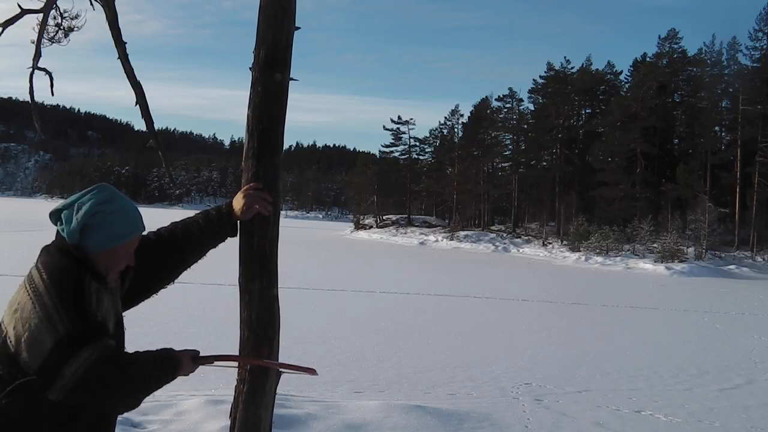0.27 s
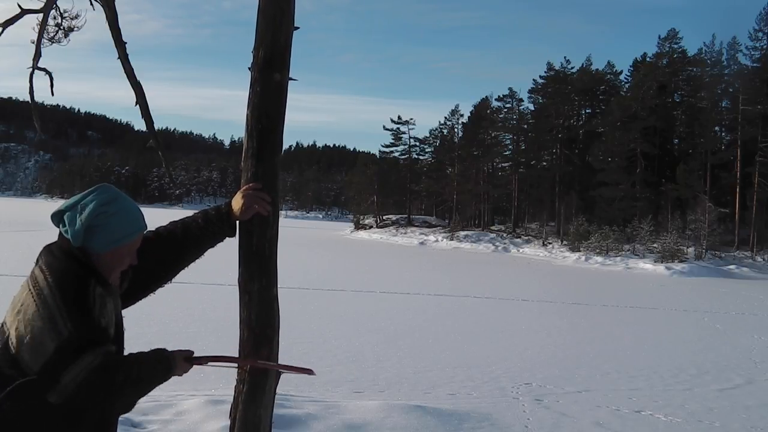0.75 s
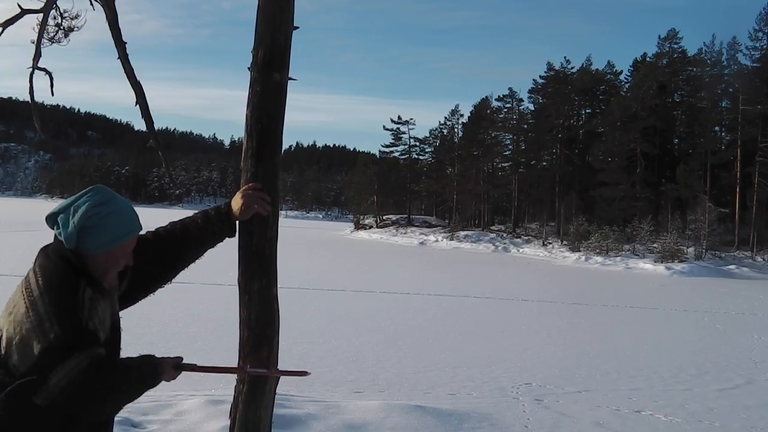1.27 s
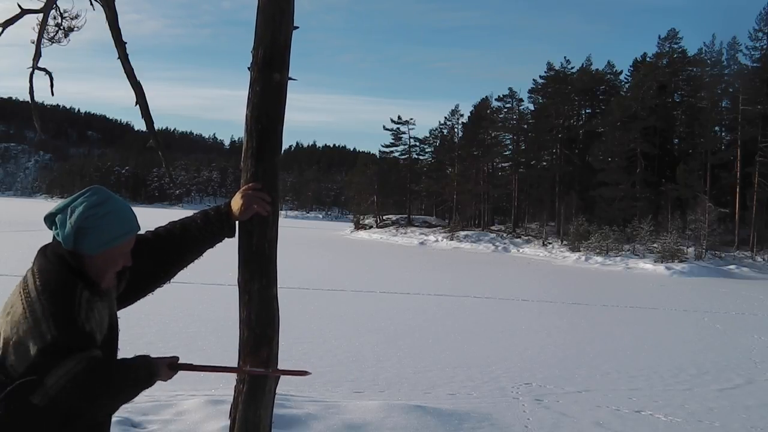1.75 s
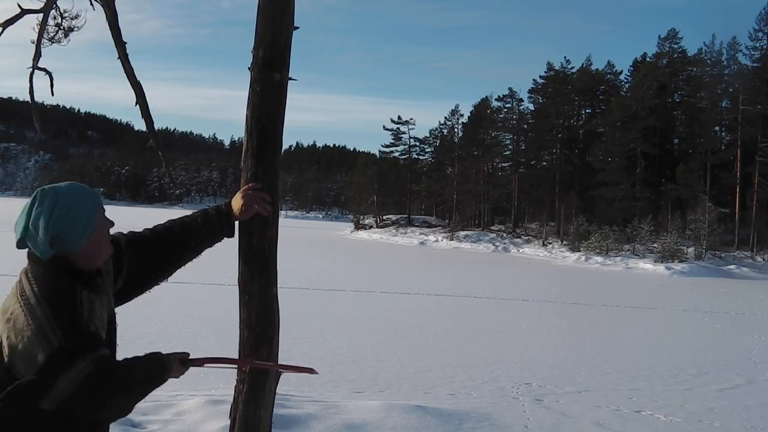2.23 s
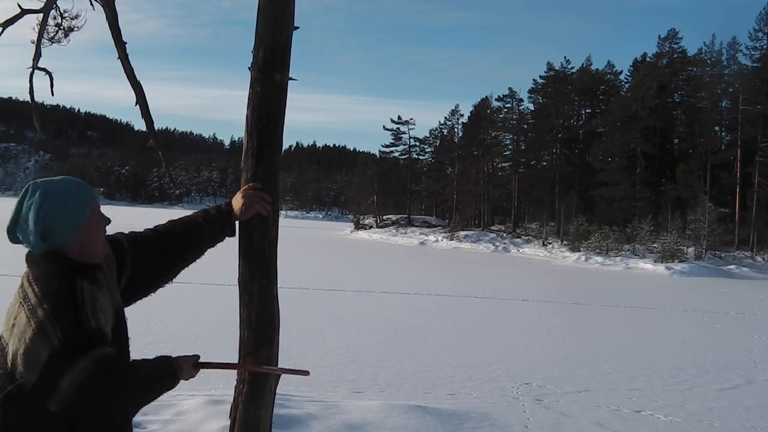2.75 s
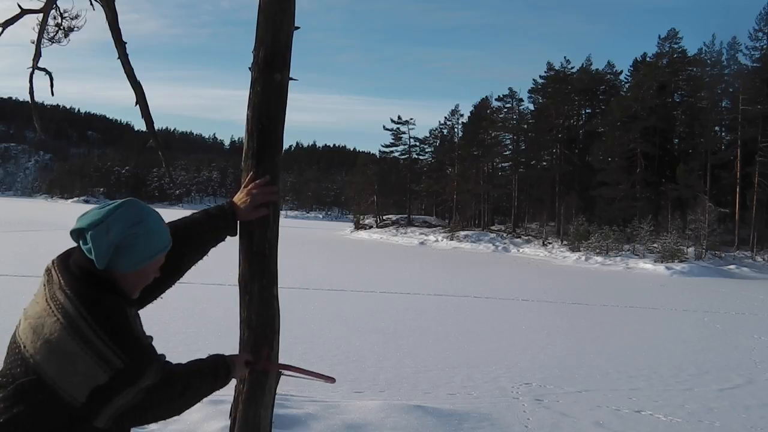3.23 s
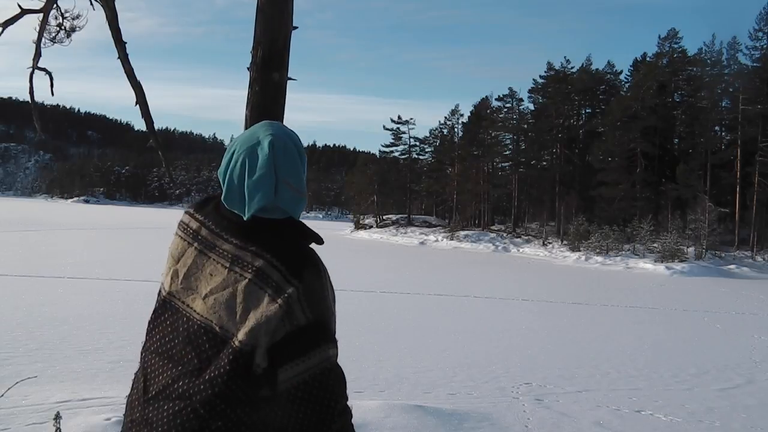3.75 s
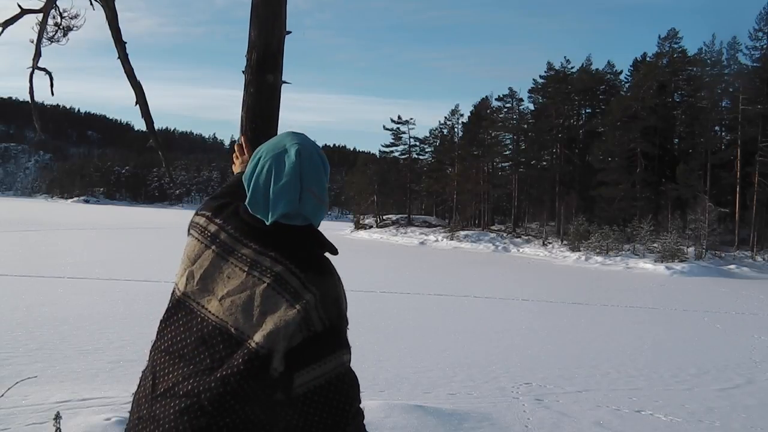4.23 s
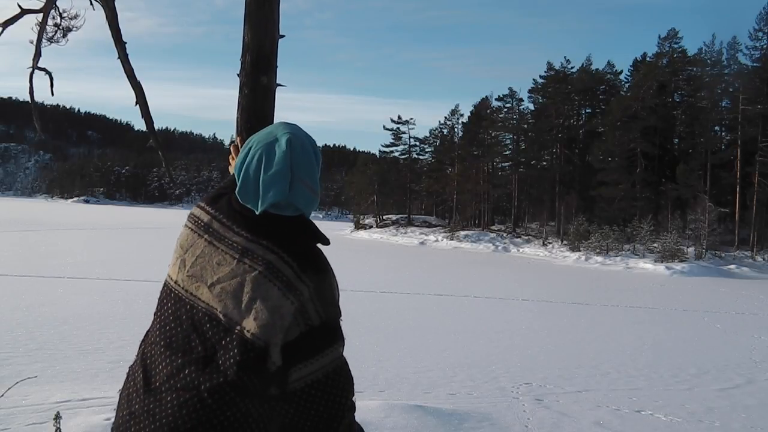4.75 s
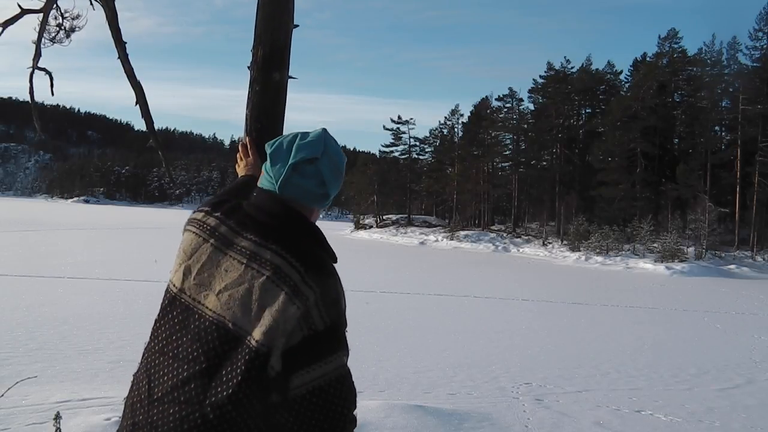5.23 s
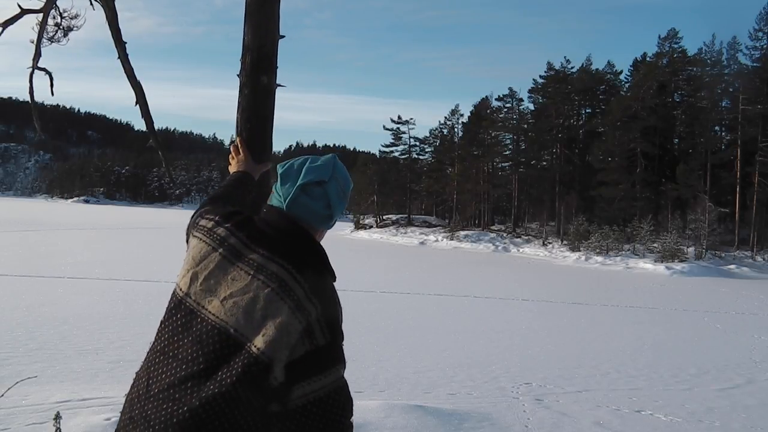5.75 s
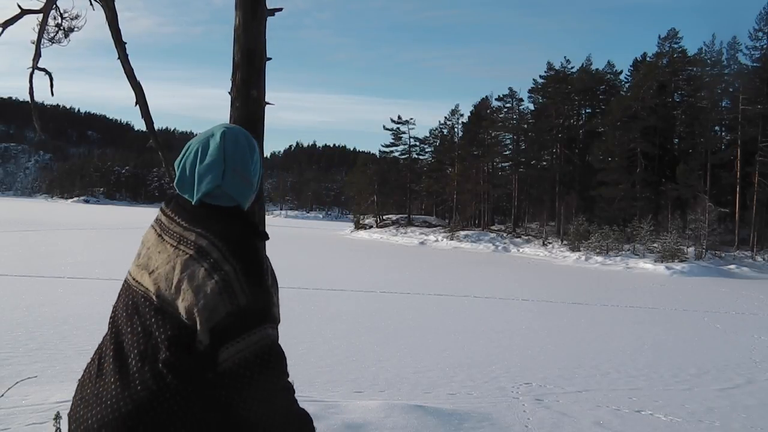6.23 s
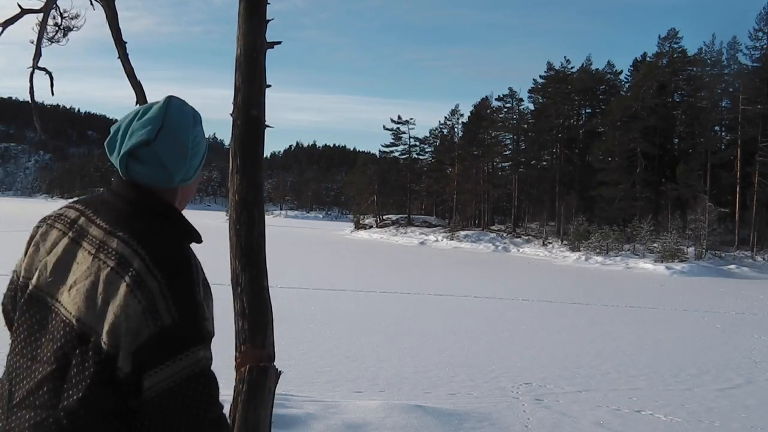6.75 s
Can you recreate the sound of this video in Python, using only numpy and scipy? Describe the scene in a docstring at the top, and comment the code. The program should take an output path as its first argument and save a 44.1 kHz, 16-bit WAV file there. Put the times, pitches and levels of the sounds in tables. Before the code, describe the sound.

Outdoors in snowy quiet, brisk bow sawing stops, boots crunch, one loud crack rings out, then a dry trunk splinters and breaks with a groan.

```python
"""Sawing and breaking a dead trunk

By a frozen lake a bow saw cuts a dry trunk in thirteen quick strokes: each tooth sprays noise grains
that ring steel and wood. Near the turns the blade catches (noise bursts) and squeaks (swept partials).
The sawyer steps round in crunching snow and leans on the trunk; it cracks a few times, then tears
in a run of snaps, splinter grains and a groaning band of noise. Two small camera microphone ports
hear it, with a thin echo from the trees (decaying noise) and a faint hiss."""
import sys
import numpy as np
from scipy import signal
from scipy.fft import rfft, irfft, next_fast_len
from scipy.io import wavfile
from scipy.ndimage import uniform_filter1d

SR = 44100
rng = np.random.default_rng(int(sys.argv[2]) if len(sys.argv) > 2 else 0)


def transcribe(signal):
    """Save signal, clipped to [-1, 1], as a 16-bit WAV file at the path in sys.argv[1]."""
    frames = np.atleast_2d(signal).T
    limited = np.clip(frames, -1, 1)
    pcm = np.round(limited * 32767).astype(np.int16)
    wavfile.write(sys.argv[1], SR, pcm)


N = 308259
TIME = np.arange(N) / SR

# Colour of teeth ripping wood: frequency_hz, relative_density_db (per Hz)
RASP_SPECTRUM = [(700, -25), (1400, -3.5), (2000, -0.5), (3300, 0.5), (4400, 2), (5500, -1.5), (7000, 6),
                 (9600, -6), (11000, -6), (13500, -19), (16000, -18.5)]
# Colour of breaking fibres: frequency_hz, relative_density_db (per Hz)
SNAP_SPECTRUM = [(250, -21), (600, -9.5), (1100, -0.5), (2200, 1), (4200, 0), (5500, -0.5), (6800, 8),
                 (8400, -3.5), (9800, 2.5), (13000, -16), (16000, -22)]
# Colour of deep thumps, treads and rumble: frequency_hz, relative_density_db (per Hz)
THUMP_SPECTRUM = [(20, -11), (45, -18), (75, 1.5), (125, 2), (200, -14.5), (400, -35), (1500, -50)]


def from_db(db):
    """Decibels to gain."""
    return 10 ** (np.asarray(db) / 20)


def rms_one(x):
    """Scale to unit power."""
    return x / np.sqrt(np.mean(x ** 2) + 1e-20)


def at_hz(points, hz):
    """Read a table on a log-frequency axis."""
    frequency_hz, value = np.transpose(points)
    return np.interp(np.log(np.maximum(hz, 1)), np.log(frequency_hz), value)


def colour(x, spectrum, size=4096):
    """Causal (minimum-phase) filter with this spectrum; white noise keeps its power."""
    gain = from_db(at_hz(spectrum, np.fft.rfftfreq(size, 1 / SR)))
    cepstrum = irfft(np.log(gain))
    # fold the cepstrum onto positive times: minimum phase
    cepstrum[1:size // 2] *= 2
    cepstrum[size // 2 + 1:] = 0
    response = irfft(np.exp(rfft(cepstrum)))
    return signal.oaconvolve(x, response / np.linalg.norm(response))[:N]


def resonance(x, hz, width_hz):
    """One two-pole resonance with gain 1 on top."""
    r = np.exp(-np.pi * width_hz / SR)
    feed = np.array([1, 0, -1]) * (1 - r * r) / 2
    return signal.lfilter(feed, [1, -2 * r * np.cos(2 * np.pi * hz / SR), r * r], x)


def drift(rate):
    """Smooth chance with spread 1, a new random value this many times a second."""
    knots = rng.standard_normal(N // 8)
    return rms_one(np.interp(TIME * rate, np.arange(len(knots)), knots))


def noise():
    """White noise of unit power."""
    return rng.standard_normal(N)


def grains(per_s, spread_db):
    """Random tiny fractures of uneven size, unit power."""
    born = rng.random(N) < per_s / SR
    sign = rng.choice([-1, 1], N)
    return rms_one(born * sign * from_db(spread_db * np.clip(noise(), -2, 2)))


def dying(power, t60):
    """Envelope of blows whose powers add and fade by 60 dB in t60 seconds."""
    return np.sqrt(signal.lfilter([1], [1, -from_db(-120 / (t60 * SR))], power + 1e-18))


def blows(times, level_db):
    """Powers of blows placed on the time line."""
    index = np.clip(np.ravel(times) * SR, 0, N - 1).astype(int)
    return np.bincount(index, np.ravel(from_db(level_db) ** 2), N)


def even(x, window_s):
    """Hold the short-term power steady, so that an envelope alone sets the level."""
    return x / np.sqrt(uniform_filter1d(x * x, max(int(window_s * SR), 2)) + 1e-9)


def swell(middle_s, half_s):
    """A smooth bell-shaped rise and fall of height 1."""
    return np.exp(-np.minimum(((TIME - middle_s) / half_s) ** 2, 50))


def shifting(x, patchy_db, rate, count=14):
    """Every fibre has its own pitch: narrow bands swell and fade independently."""
    centres = np.geomspace(900, 12000, count)
    depth = from_db(patchy_db) - 1
    return x + sum(depth * drift(rate) * resonance(x, hz, hz / 6) for hz in centres)


def trunk_ring(hz, width_hz):
    """The trunk's main bending resonance, shaken at random: a narrow band round a fixed or moving centre."""
    lowpass = signal.butter(2, width_hz / 2, fs=SR, output="sos")
    wander = signal.sosfilt(lowpass, noise() + 1j * noise())
    phase = 2 * np.pi * np.cumsum(np.broadcast_to(hz, N)) / SR
    return even(np.real(wander * np.exp(1j * phase)), window_s=0.047)


def saw(top_teeth_per_s=380, tooth_db=1.6, knot_db=1.0):
    """Teeth pass faster in mid-stroke; each rips a spray of fibres that rings the blade and the trunk."""
    # Push and pull in turn: start_s, end_s, force_db
    strokes = [(-0.11, 0.14, -1.5), (0.18, 0.372, 0.5), (0.402, 0.61, 1), (0.655, 0.858, -0.5),
               (0.895, 1.092, 1), (1.155, 1.352, 1), (1.39, 1.595, 1), (1.635, 1.838, 0.5),
               (1.885, 2.085, -1), (2.135, 2.34, -1), (2.393, 2.587, -3.5), (2.63, 2.832, -1),
               (2.9, 3.09, -3.5)]
    # A push bears down late, a pull early: hardest_at (share of stroke), swell_db, roundness (exponent),
    # then relative levels rasp_db, deep_bite_db, trunk_db
    push = (0.79, 8, 1.15, -24.5, -36, -37.5)
    pull = (.2, 5.5, 0.52, -35, -41.5, -41.5)
    # Brief surges of rasp, with more or less deep bite:
    # middle_s, half_length_s, rasp_change_db, deep_bite_change_db
    surges = [(0.53, 0.023, 5, -3), (1.526, 0.045, 3, 11), (1.725, 0.011, 8, 16.5), (1.994, 0.02, 5.5, 15),
              (2.52, 0.023, 4, -5)]
    # Resonances of the steel blade: frequency_hz, width_hz, level_db
    steel_modes = [(2600, 100, -64), (4025, 116, -0.5), (4516, 157, 2), (5460, 43, -9.5), (9740, 430, 10)]
    # Colour of the deep bite: frequency_hz, relative_density_db (per Hz)
    bite_spectrum = [(30, -8.5), (100, 0), (280, -12.5), (700, -4), (1200, 2), (1700, -3.5), (2800, -10.5),
                     (6000, -35)]
    bear_down_s = 0.038   # how quickly the bite eases either side of the hardest moment
    force_to_trunk, surge_to_trunk = 0.4, 0.11   # dB in the trunk per dB of force or bite change
    push_hz, pull_hz, pull_sag_hz_per_s = 467, 615, 45   # the pull's note sinks as the cut deepens
    rest_db = -57   # rubbing in the cut at the turns, before the rasp's gain

    speed, rasp, bite, trunk, centre_hz = np.zeros((5, N))
    rasp_surge_db = sum(db * swell(s, half) for s, half, db, _ in surges)
    bite_surge_db = sum(db * swell(s, half) for s, half, _, db in surges)
    for k, (start, end, force_db) in enumerate(strokes):
        is_pull = k % 2 == 1
        hardest, swell_db, roundness, rasp_db, bite_db, trunk_db = pull if is_pull else push
        along = np.clip((TIME - start) / (end - start), 0, 1)
        moving = np.maximum(np.sin(np.pi * along), 0) ** roundness
        away_s = abs(TIME - start - hardest * (end - start))
        easing_db = -swell_db * (1 - np.exp(-away_s / bear_down_s))   # the arm bears down at one moment
        speed += moving
        rasp += moving * from_db(rasp_db + force_db + easing_db + rasp_surge_db)
        bite += moving * from_db(bite_db + force_db + easing_db + bite_surge_db)
        trunk_force_db = force_to_trunk * force_db + surge_to_trunk * bite_surge_db
        trunk += moving * from_db(trunk_db + trunk_force_db + easing_db)
        centre_hz[TIME >= start] = pull_hz - pull_sag_hz_per_s * start if is_pull else push_hz
    rasp += from_db(rest_db) * (TIME < strokes[-1][1])

    teeth = np.cumsum(top_teeth_per_s * speed * (1 + 0.1972 * drift(200))) / SR
    grip = rms_one(from_db(tooth_db * np.cos(2 * np.pi * teeth) + knot_db * drift(160)))
    chips = grip * grains(per_s=9000, spread_db=-0.5)
    steel = sum(from_db(db) * resonance(chips, hz, width) for hz, width, db in steel_modes)
    clumps = from_db(1.0 * drift(120))   # the teeth dig in unevenly
    ripping = shifting(colour(chips + steel, RASP_SPECTRUM), patchy_db=2.0, rate=33)
    gouges = colour(grip * grains(per_s=2000, spread_db=5.0), bite_spectrum)
    digging = clumps * shifting(gouges, patchy_db=4.5, rate=30)
    ringing = trunk_ring(centre_hz, width_hz=145)
    return from_db(3.5) * rasp * ripping + from_db(1.0) * bite * digging + from_db(-0.5) * trunk * ringing


def squeaks(jitter=0.043, rough_db=2, scrape_db=-5):
    """Near the start of a stroke, the pinched blade sticks and slips in a short, rough, rising chirp."""
    # Chirps: start_s, length_s, pitch_hz, relative_level_db
    chirps = [(1.395, .012, 1840, -28.5), (1.406, 0.015, 2010, -28), (1.88, 0.023, 1764, -27),
              (2.388, 0.019, 1500, -41)]
    # How strongly the blade sounds the partials: frequency_hz, gain_db
    partial_gain = [(1450, -4), (1800, 0), (3000, 7.5), (3800, -7), (5400, 3), (7500, 0.5), (12000, -18)]
    rise = 0.1   # share by which the pitch climbs during a chirp

    out, scrape = np.zeros((2, N))
    waver = 1 + jitter * drift(1800)
    # each partial flutters in level on its own
    partial_flutter = [np.tanh(drift(500)) for partial in range(6)]
    for start, length, hz, level_db in chirps:
        on = (TIME > start) & (TIME < start + length)
        along = (TIME[on] - start) / length
        climb = 1 + rise * (np.sqrt(along) - 2 / 3)   # the mean pitch stays put
        phase = 2 * np.pi * np.cumsum(hz * climb * waver[on]) / SR
        partials = 0
        for k, flutter in enumerate(partial_flutter, 1):
            gain_db = at_hz(partial_gain, k * hz) + rough_db * flutter[on]
            partials += from_db(gain_db) * np.sin(k * phase)
        envelope = np.sin(np.pi * along)
        out[on] += from_db(level_db) * np.sqrt(2) * envelope * partials
        scrape[on] = from_db(level_db + scrape_db) * envelope
    return out + scrape * colour(noise(), RASP_SPECTRUM)   # the teeth scrape through each chirp


def snaps(rows, snap_t60=0.0051, follow_gap_s=.0036, follow_db=-8, fade_db=4, tail_db=-21, tail_t60=0.12,
          wood_t60=0.089, thump_t60=.11, lead_db=-12, lead_t60=0.013, count=3):
    """A soft swell of noise leads into each snap, then neighbours follow; wood rings, the ground thumps."""
    # Colour of the ringing wood: frequency_hz, relative_density_db (per Hz)
    wood_spectrum = [(120, -4.5), (280, -25.5), (420, 3.5), (680, -1.5), (950, 3), (1400, -5), (3000, -10),
                     (8000, -65)]
    full_thump_db, thump_follows = -26, 0.76   # thump at 0 dB of wood, before its gain; dB per dB of wood
    # more wood in a snap than usual means a thicker, duller fibre: dB per dB, usual dB against the peak
    thick_dulls, usual_wood_db = 0.19, -20.5

    s, peak_db, wood_db = np.transpose(rows)
    thump_db = full_thump_db + thump_follows * wood_db
    chance = rng.random((len(s), 2, count))
    later = s[:, None] + np.cumsum(follow_gap_s * (.5 + chance[:, 0]), axis=1)
    weaker = peak_db[:, None] + follow_db - fade_db * np.arange(count) + 6 * (chance[:, 1] - .5)
    first = blows(s, peak_db)
    lead_in = from_db(lead_db) * dying(first[::-1], lead_t60)[::-1]   # a decay turned round in time
    debris = from_db(tail_db + 0.93 * drift(500)) * dying(first, tail_t60)
    burst = dying(first + blows(later, weaker), snap_t60) + lead_in + debris

    fibres = colour(burst * even(noise(), window_s=0.00061), SNAP_SPECTRUM)
    crack = from_db(-0.5) * shifting(fibres, patchy_db=2.5, rate=50)
    dull = signal.sosfilt(signal.butter(1, 3500, fs=SR, output="sos"), crack)
    thickness = from_db(thick_dulls * np.interp(TIME, s, wood_db - peak_db - usual_wood_db))
    wood_noise = even(colour(noise(), wood_spectrum), window_s=0.008)
    wood = from_db(-3.0) * dying(blows(s + 0.00062, wood_db), wood_t60) * wood_noise
    thump_noise = even(colour(noise(), THUMP_SPECTRUM), window_s=0.031)
    thump = from_db(5) * dying(blows(s + 0.0025, thump_db), thump_t60) * thump_noise
    return dull * thickness + (crack - dull) / thickness + wood + thump


def tearing(groan_hz=440, thinness=0.48):
    """Small splinters part in clumps while the bending trunk groans and rumbles."""
    # The trunk gives way, strength of the splintering: time_s, relative_level_db
    giving_way = [(5.83, -30.5), (5.888, -45), (6.006, -51), (6.056, -43), (6.156, -37), (6.292, -38.5),
                  (6.534, -36), (6.77, -48), (6.99, -48)]
    # Each heave builds a groan until the fibres let go: letting_go_s, build_s, relative_level_db
    heaves = [(5.91, 0.021, -31.5), (6.04, 0.021, -43), (6.439, 0.1, -26), (6.79, 0.041, -35.5)]
    let_go_s = 0.015
    rumble_db, rumble_follows = -39.5, 0.24   # the roots rumble; dB per dB of splintering

    time_s, level_db = np.transpose(giving_way)
    splinters = from_db(np.interp(TIME, time_s, level_db, left=-120, right=-120))
    groan = 0
    for s, build, db in heaves:
        groan += from_db(db) * np.exp(np.minimum((TIME - s) / build, (s - TIME) / let_go_s))
    rumble = from_db(rumble_db) * splinters ** rumble_follows * (TIME > giving_way[0][0])
    clumps = grains(per_s=3000, spread_db=3.5) * from_db(1.8 * drift(180))
    # thin splinters sound brighter than big cracks
    clumps = rms_one(signal.lfilter([1, -thinness], [1], clumps))
    parting = shifting(colour(clumps, SNAP_SPECTRUM), patchy_db=4.0, rate=60)
    parting_level = from_db(5.0) * splinters + from_db(-5) * groan   # splinters part in each heave too
    groan_level = from_db(-1) * groan + from_db(-11) * splinters
    roots = rumble * even(colour(noise(), THUMP_SPECTRUM), window_s=0.048)
    return parting_level * parting + groan_level * trunk_ring(groan_hz, width_hz=128) + roots


def knocks(roughness=.12):
    """A dull jolt swings the trunk or the ground in a short burst of uneven pitch."""
    # Jolts: start_s, length_s, pitch_hz, level_db
    jolts = [(1.657, 0.011, 1150, -30), (1.672, 0.018, 490, -27), (1.721, 0.024, 475, -20.5),
             (2.22, 0.09, 514, -32.5), (4.076, .015, 230, -39), (4.079, 0.039, 99, -35),
             (4.548, 0.028, 114.6, -33), (5.881, 0.017, 905, -20.5), (6.013, 0.0094, 884, -25),
             (6.014, 0.019, 499, -23), (6.719, 0.014, 449.5, -14.5), (6.733, 0.035, 85, -27)]
    out, waver = np.zeros(N), 1 + roughness * drift(700)
    for start, length, hz, level_db in jolts:
        swing = np.sin(np.pi * np.clip((TIME - start) / length, 0, 1))
        out += from_db(level_db) * swing * np.sin(2 * np.pi * hz * np.cumsum(waver) / SR)
    return out


def steps():
    """Boots pack the cold snow: a gritty crunch over a soft tread."""
    # Boots sink in: middle_s, half_length_s, relative_crunch_db, tread_db
    footfalls = [(3.149, 0.094, -44.5, -57), (3.278, 0.051, -55.5, -44), (3.44, 0.19, -48.5, -66),
                 (4.51, 0.2, -53.5, -74), (4.723, 0.031, -56, -52.5), (5.242, 0.067, -53.5, -78),
                 (6.835, 0.072, -44, -40.5), (6.99, 0.033, -35.5, -52)]
    # Colour of the crunch: frequency_hz, relative_density_db (per Hz)
    crunch_spectrum = [(100, -16), (450, 4.5), (800, -1.5), (2000, 0), (6500, 1.5), (10000, 5),
                       (14000, -12)]
    crunch = sum(from_db(db) * swell(s, half) for s, half, db, _ in footfalls)
    tread = sum(from_db(db) * swell(s, half) for s, half, _, db in footfalls)
    grit = rms_one(grains(per_s=3000, spread_db=1) * from_db(2.2 * drift(60)))
    soft = even(colour(noise(), THUMP_SPECTRUM), window_s=0.047)
    return from_db(2.5) * crunch * colour(grit, crunch_spectrum) + tread * soft


def ports(x, scatter_db):
    """Two ports resonate differently in the treble; fibres break at shifting spots and reach them unalike."""
    # Phase between the ports: frequency_hz, left_lead_rad
    port_phase = [(4000, 0), (5100, .4), (6200, 1.1), (6950, 3.2), (8100, 3.5), (8650, 1.1), (9400, 1.9),
                  (10200, 3.9), (11500, 6), (16000, 6.2)]
    # Balance of the ports: frequency_hz, left_minus_right_db
    port_balance = [(450, 1.8), (1000, 0), (4200, 0), (6000, 4), (6900, 6), (7700, 2), (8400, -4),
                    (9400, 7), (10400, 1), (12000, 0)]
    # Share of unrelated sound, before scatter_db: frequency_hz, share_db
    port_scatter = [(150, -12), (450, -19), (1200, -25), (3500, -21), (6000, -11), (16000, -8)]
    size = next_fast_len(N + SR)
    hz = np.fft.rfftfreq(size, 1 / SR)
    direct = rfft(x, size)
    # a quarter turn out of phase, opposite in sign at the two ports
    scatter = 1j * from_db(scatter_db + at_hz(port_scatter, hz)) * rfft(x * drift(200), size)
    tilt = from_db(at_hz(port_balance, hz))
    left = tilt * (direct + scatter)
    right = (direct - scatter) * np.exp(-1j * at_hz(port_phase, hz))
    same_power = np.sqrt(2 / (1 + tilt ** 2))
    return irfft(np.array([left, right]) * same_power, size)[:, :N]


def trees(x, echo_db=-27, t60=1.0, build_s=0.005):
    """Trunks around scatter back a thin, dull tail, different at each port."""
    t = TIME[:SR]
    tail = rng.standard_normal((2, SR)) * from_db(-60 * t / t60) * (1 - np.exp(-t / build_s))
    tail = signal.sosfilt(signal.butter(1, [200, 3000], "band", fs=SR, output="sos"), tail)
    tail /= np.linalg.norm(tail, axis=1, keepdims=True)
    return from_db(echo_db) * signal.oaconvolve(x[None], tail, axes=1)[:, :N]


def hiss(level_db=-56, side_db=4.5):
    """The steady hiss of the microphones, wide: the side signal is stronger than the middle."""
    # Colour of the hiss: frequency_hz, relative_density_db (per Hz)
    hiss_spectrum = [(20, -10), (90, 8), (250, -4), (420, 9), (650, 0), (1500, -2), (5000, -3.5),
                     (10000, -3), (16000, -10)]
    mid = colour(noise(), hiss_spectrum)
    side = from_db(side_db) * colour(noise(), hiss_spectrum)
    return from_db(level_db) * np.array([mid + side, mid - side])


def scene():
    """Sawing, stepping round and breaking the trunk; cut and knocks share one spot, the break spreads."""
    # A tooth catches: time_s, relative_peak_db, relative_wood_db
    catch_rows = [(0.2058, -15.5, -45), (0.6712, -10, -29), (1.1681, -12, -23.5), (1.6461, -17.5, -50),
                  (2.6738, -7.5, -30), (3.0963, -19.5, -37)]
    # Wood fibres snap: time_s, relative_peak_db, relative_wood_db
    crack_rows = [(4.0766, -19.5, -38), (4.3341, -30.5, -66), (4.5472, -2, -20.5), (5.4069, -31, -45),
                  (5.5684, -36.5, -47.5), (5.8441, -2.5, -27), (5.882, -1, -11.5), (5.9612, -15, -48),
                  (5.9807, -10.5, -20), (6.0617, -7, -17), (6.0948, -8, -28.5), (6.1574, -0.5, -22.5),
                  (6.212, -16.5, -35), (6.2986, -8.5, -21.5), (6.345, -16, -27), (6.3632, -3.5, -20.5),
                  (6.441, 0, -39), (6.6333, -9.5, -31), (6.6796, -13.5, -48), (6.7111, -15, -30.5),
                  (6.7997, -19, -40)]
    catches = snaps(catch_rows, snap_t60=0.0071, lead_db=-15.5, lead_t60=0.026, wood_t60=0.13)
    one_spot = saw() + squeaks() + from_db(-4) * catches + knocks()
    spread = steps() + snaps(crack_rows) + tearing()
    heard = ports(one_spot, scatter_db=-1.5) + ports(spread, scatter_db=3)
    return heard + trees(one_spot + spread) + hiss()


def record(dry):
    """The camera thins the deep bass, notches a narrow treble band, rounds high peaks and cuts the top."""
    notch_hz, notch_width_hz, cutoff_hz = 7870, 420, 15900
    thinned = signal.sosfilt(signal.butter(1, 35, "high", fs=SR, output="sos"), dry)
    notched = thinned - resonance(thinned, notch_hz, notch_width_hz)
    rounded = np.tanh(notched)
    return signal.sosfilt(signal.ellip(10, .2, 80, cutoff_hz, fs=SR, output="sos"), rounded)


dry = scene()
out = record(dry)
transcribe(out)
```